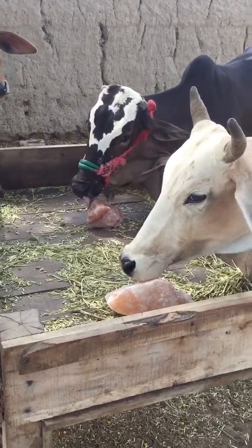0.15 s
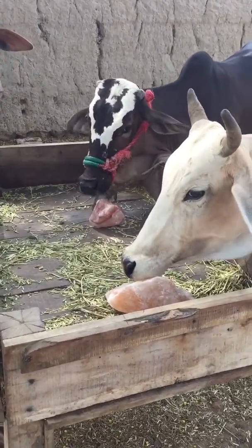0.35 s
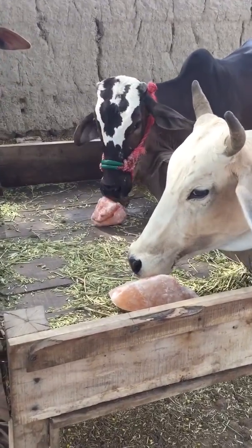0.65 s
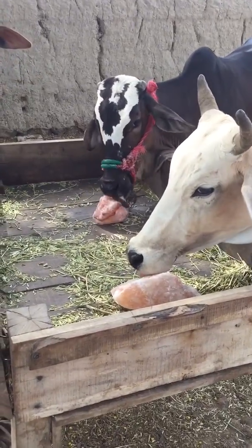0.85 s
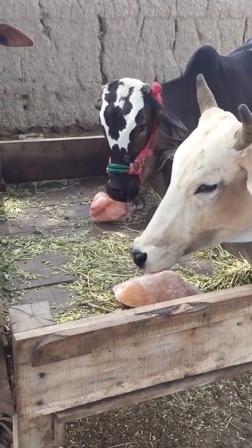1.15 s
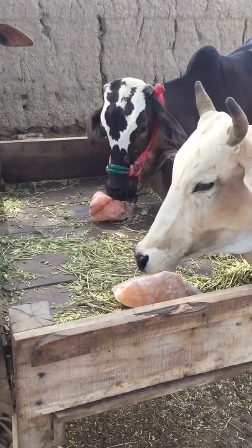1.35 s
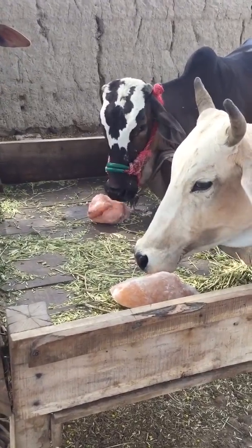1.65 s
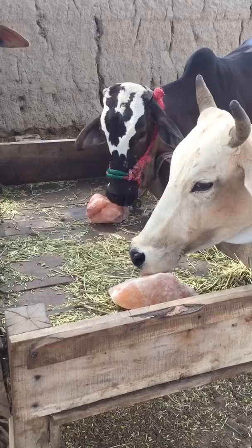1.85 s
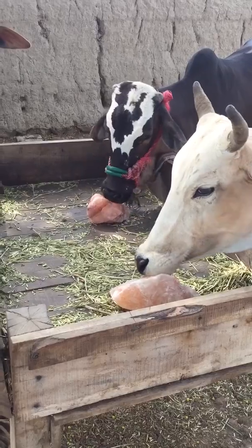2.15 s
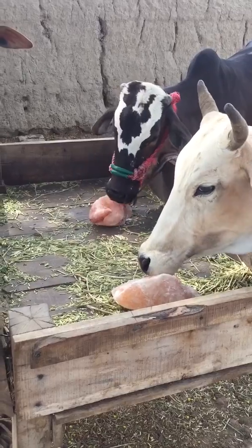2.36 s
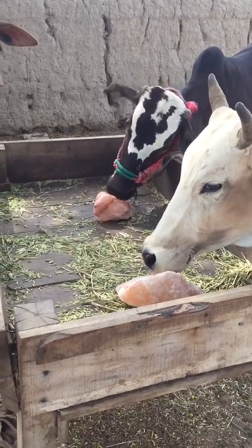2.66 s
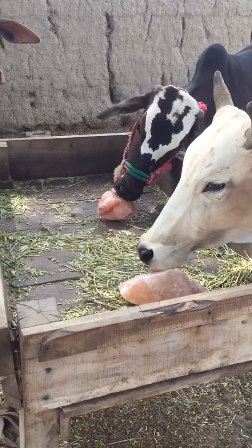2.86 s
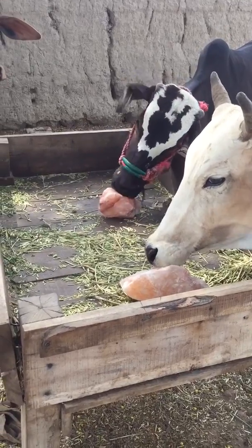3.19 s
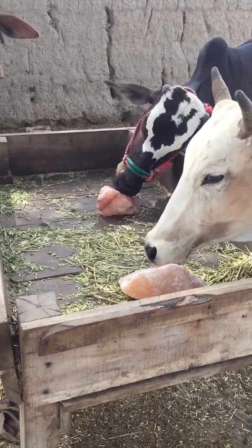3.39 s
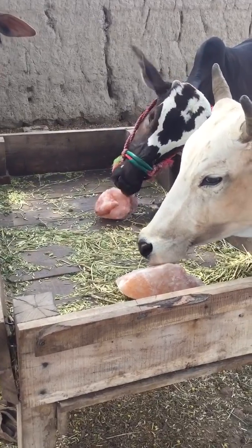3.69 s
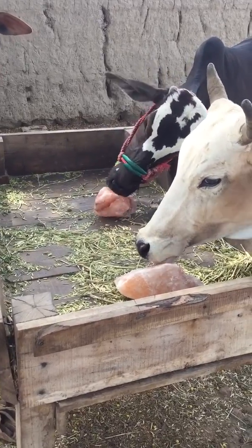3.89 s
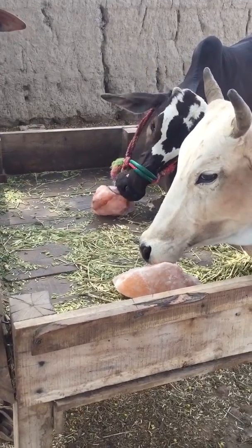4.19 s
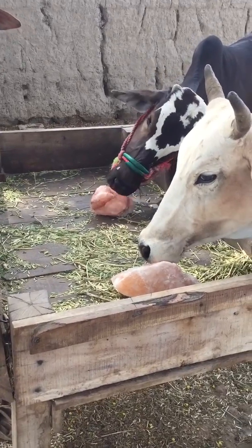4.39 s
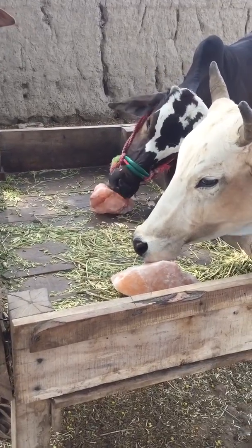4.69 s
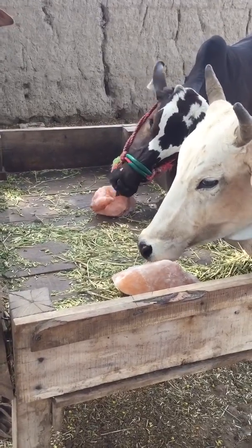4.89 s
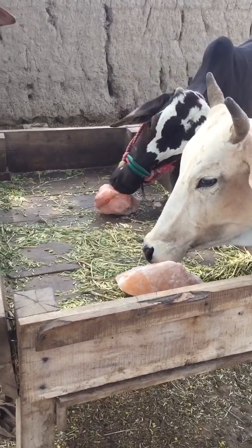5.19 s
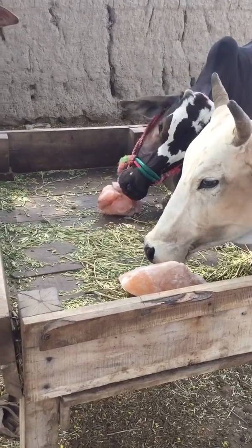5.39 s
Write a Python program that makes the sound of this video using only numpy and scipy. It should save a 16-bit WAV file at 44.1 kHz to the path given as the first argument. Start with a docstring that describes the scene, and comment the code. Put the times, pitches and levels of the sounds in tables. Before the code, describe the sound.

Close mono sound of cows licking rock salt in a wooden trough. A long rasping, slurping stroke swells to about 0.2-0.3 s, with a tight cluster of hollow wooden knocks and a grinding drag; a wet smack follows at 0.45. A faint, hoarse distant low sinks away by 0.65. It is calmer until a softer lick near 1.0-1.2 with dull bumps. A sharp crunch comes at 1.67, and short licks and light knocks run from 1.7 to 2.4, with a tiny chirp at 1.9. Knocks crowd at 2.6-2.7 over faint chirps, then a strong wet lick and drag at 3.0. Another rasp with a crisp crunch falls around 3.7. Heavy knocks and smacks hit at 4.35 and 4.93, the latter with a juicy slurp; faint chirps follow at 5.1-5.2. It ends on a loud knock, wet smack and scrape at 5.5. Low boom, quiet air and a short pen tail underlie everything.

```python
"""Cows licking rock salt in a wooden trough

Tongue strokes swell, hold and let go: filtered random clicks rasp and slurp while a dragged lump
grinds on the wood. Knocks are decaying plank modes; lip smacks are click bursts ringing the mouth.
Spit hisses, crystal edges crunch, a bird chirps in glides and a far cow lows in harmonics.
Low boom and quiet air lie beneath; a mud-walled pen adds a short tail."""
import sys
import numpy as np
from scipy import signal
from scipy.fft import rfft, irfft, next_fast_len
from scipy.io import wavfile
from scipy.ndimage import uniform_filter1d

SR = 44100
rng = np.random.default_rng(int(sys.argv[2]) if len(sys.argv) > 2 else 0)


def transcribe(signal):
    """Save signal, clipped to [-1, 1], as a 16-bit WAV file at the path in sys.argv[1]."""
    frames = np.atleast_2d(signal).T
    limited = np.clip(frames, -1, 1)
    pcm = np.round(limited * 32767).astype(np.int16)
    wavfile.write(sys.argv[1], SR, pcm)


N = 244307
TIME = np.arange(N) / SR

# All table levels are relative; the functions add their own gains.
# strokes of the tongue over the salt: (full contact t/s, hold/s, swell/s, release/s,
# rasp level/dB, wet slurp level/dB, drag on the planks level/dB)
LICKS = [(0.0, 0.038, 0.12, .15, -60.5, -66, -50.5), (0.218, 0.08, 0.38, .18, -44, -48.5, -37.5),
         (1.031, 0.14, 0.25, 0.17, -52.5, -55, -47.5), (1.662, 0.028, 0.15, 0.063, -45, -54, -57.5),
         (1.903, 0.013, 0.096, 0.081, -63, -82, -68), (2.043, 0.098, 0.25, .05, -51.5, -57, -77),
         (2.299, 0.0089, 0.11, 0.08, -62, -59, -48), (2.347, 0.022, 0.039, 0.035, -44, -52.5, -49),
         (2.978, 0.075, 0.23, 0.19, -48.5, -49, -35), (3.663, 0.083, 0.24, 0.14, -49, -53, -54),
         (3.813, 0.062, .1, .15, -66.5, -66.5, -83), (3.951, 0.018, 0.16, 0.066, -51.5, -52, -49),
         (4.317, 0.11, 0.21, 0.076, -51, -56, -41), (4.695, 0.01, 0.11, 0.16, -59, -68, -58),
         (4.903, 0.087, 0.35, 0.068, -48, -49.5, -54), (5.518, .04, 0.21, .1, -55.5, -54, -27)]
# a lump knocks on the planks: (t/s, peak level/dB, deep thump level/dB, hard edge level/dB)
KNOCKS = [(0.164, -33.5, -30, -53), (0.226, -15.5, -17.5, -19.5), (0.254, -23.5, -18, -18.5),
          (0.296, -22, -22, -17), (0.334, -23.5, -32, -14), (1.112, -33, -12, -19), (1.203, -37, 8, -43),
          (1.264, -27.5, -8, -40), (1.347, -29, -17, -17.5), (1.73, -30.5, -7, -25),
          (1.849, -24, -6.5, -13.5), (1.942, -21, 1, -17.5), (2.18, -38, -23, -19.5),
          (2.271, -29, -14.5, -21), (2.343, -16.5, -18.5, -32.5), (2.541, -34.5, -5, -19),
          (2.612, -11.5, -11.5, -19), (2.655, -16, -11, -24), (2.696, -10.5, -17, -24),
          (2.715, -16, -8.5, -20), (2.839, -28, -16, -26), (2.963, -10, -14, -12.5), (2.984, -18, -34, -22),
          (3.047, -16.5, -15.5, -15), (3.066, -18.5, -5, -11), (3.121, -29.5, 16, -3), (3.164, -36, 5, -10),
          (3.308, -34, -29, -26), (3.624, -13.5, -11.5, -16), (3.659, -20, -9.5, -46),
          (3.874, -39, -34, -16), (3.943, -15.5, -14.5, -22.5), (4.021, -22, -7, -24),
          (4.056, -22, -5, -49), (4.213, -29, -27, -22), (4.268, -26.5, -15, -19), (4.316, -19, -8, -19),
          (4.353, -4.5, -17.5, -20.5), (4.437, -36, -1, -16), (4.508, -28, -7.5, -13.5),
          (4.812, -30, -20, -14.5), (4.863, -32.5, -17, -16.5), (4.928, -10, -11, -20),
          (5.184, -15, -14.5, -21.5), (5.352, -34, -15, -6), (5.465, -20, -20.5, -19.5),
          (5.513, -7, -13.5, -27.5)]
# modes of the loaded trough floor: (f/Hz, level/dB, t60/s)
PLANKS = [(84.7, -40, 0.18), (100.7, -8.5, 0.37), (134.7, 8, 0.083), (166, 0.5, 0.079), (221.9, -2.5, 0.12),
          (271, 5, 0.057), (300, 0, 0.098), (382.5, -5, 0.098), (471, -8, 0.028), (629, -17.5, 0.058),
          (726.6, -8.5, 0.062), (795, -14.5, 0.07), (838, -29, 0.069), (1077, -9, 0.037),
          (1250, -20, 0.013), (1580, -23, 0.054), (1411, -17.5, 0.046), (2030, -23.5, 0.033)]
# spectrum of dry tongue on crystal: (f/Hz, level/dB)
RASP = [(3000, -16), (5500, -9), (7200, -3.5), (8600, 7), (10200, 1), (11800, 4), (14000, -0.5),
        (16000, 1.5)]


def undb(db):
    """Amplitude ratio of a level in dB."""
    return 10 ** (np.asarray(db) / 20)


def unit(x):
    """Normalization: the sound at rms 1."""
    return x / np.sqrt(np.mean(x ** 2))


def add(out, sound, start):
    """Superposition: mix a sound in at its start time in s."""
    i = max(int(start * SR), 0)
    out[i:i + len(sound)] += sound[:max(len(out) - i, 0)]


def colour(x, points):
    """Spectral shaping by (f/Hz, level/dB) points, interpolated over log frequency; rms 1."""
    hz, db = np.transpose(points)
    n = next_fast_len(len(x), True)
    f = np.maximum(np.fft.rfftfreq(n, 1 / SR), 1)
    gain = undb(np.interp(np.log(f), np.log(hz), db))
    return unit(irfft(rfft(x, n) * gain, n)[:len(x)])


def resonate(x, hz, width_hz):
    """A single resonance of given bandwidth, gain 1 at its centre."""
    b, a = signal.iirpeak(min(hz, SR / 2 - 1000), hz / width_hz, fs=SR)
    return signal.lfilter(b, a, x)


def fade(t, t60):
    """Free exponential decay: the level falls 60 dB in t60 seconds."""
    return np.exp(-np.log(1000) * t / t60)


def walk(rate):
    """Random modulation: random levels 1 / rate s apart, joined by straight slopes; rms 1."""
    k = max(int(SR / rate), 1)
    steps = np.repeat(rng.standard_normal(N // k + 1), k)
    return unit(uniform_filter1d(steps, k)[:N])


def grains(rate, spread_db):
    """Shot noise: clicks of uneven size and random sign, on average rate per second; rms 1."""
    hit = rng.random(N) < rate / SR
    sign = rng.choice([-1, 1], N)
    size = undb(spread_db * np.minimum(rng.exponential(size=N), 4))
    return unit(hit * sign * size)


def shifting(x, depth_db, size=256):
    """Time-varying resonance: the tongue-salt gap changes shape, so broad peaks come and go."""
    bands = signal.stft(x, nperseg=size)[2]
    field = rng.standard_normal(bands.shape)
    # smooth twice over frequency, then twice over time
    for axis in (0, 0, 1, 1):
        field = uniform_filter1d(field, size=5 + 5 * axis, axis=axis)
    return signal.istft(bands * undb(depth_db * unit(field)), nperseg=size)[1][:N]


def stroke(start, hold, swell, release):
    """Exponential envelope: the pressure of a lick swells, holds and lets go."""
    swell_db = 49.5  # rise during swell seconds, fall during release seconds
    early = np.maximum(start - TIME, 0)
    late = np.maximum(TIME - start - hold, 0)
    return undb(-swell_db * (early / swell + late / release))


def grinding():
    """Forced vibration: the sliding lump ticks over the wood grain and keeps the planks ringing."""
    # spectrum of the lump sliding on wood: (f/Hz, level/dB)
    drag_colour = [(35, -32), (70, 21), (130, 4), (320, 15.5), (480, -17), (750, -1), (1150, -17),
                   (1800, -15), (3500, -33)]
    ring_db, tilt_db_per_octave = -4, 7.5  # plank ringing; the tilt weakens modes below 330 Hz and spares those above
    t = np.arange(SR // 4) / SR
    ticks = grains(rate=700, spread_db=2.0)
    hz, db, t60 = np.transpose(PLANKS)
    gain = undb(db + tilt_db_per_octave * np.minimum(np.log2(hz / 330), 0))
    modes = np.sin(2 * np.pi * np.outer(hz, t)) * fade(t, t60[:, None])
    ringing = unit(signal.fftconvolve(ticks, gain @ modes)[:N])
    return unit(colour(ticks, drag_colour) + undb(ring_db) * ringing)


def tongue(rasp_db=-1, slurp_db=0, drag_db=2, catch_db=2, judder_db=1.5):
    """Stick-slip: horny papillae catch on crystals, spit fizzes and the dragged lump grinds on wood."""
    # spectrum of fizzing spit: (f/Hz, level/dB)
    slurp_colour = [(700, 8.5), (1500, 8), (2600, 5.5), (4000, 4), (6200, 7.5), (8500, -0.5), (15000, -14)]
    idle_slurp_db, idle_drag_db, idle_wander_db = -76.5, -70, 6  # mouths work between strokes
    breakaway_s, settle_s = 0.078, 0.28  # swell and release times of the sliding lump
    idle = undb(idle_wander_db * walk(12))
    rasp, slurp, drag = 0, undb(idle_slurp_db) * idle, undb(idle_drag_db) * idle
    for start, hold, swell, release, dry_db, wet_db, pull_db in LICKS:
        pressure = stroke(start, hold, swell, release)
        rasp = rasp + undb(dry_db) * pressure
        slurp = slurp + undb(wet_db) * pressure
        drag = drag + undb(pull_db) * stroke(start, hold, breakaway_s, settle_s)
    catch = unit(undb(catch_db * walk(160)))  # rows of papillae let go together
    judder = unit(undb(judder_db * walk(60)))  # the lump sticks and slides
    crystals = shifting(grains(rate=7000, spread_db=4), depth_db=2.8)
    spit = shifting(grains(rate=3500, spread_db=3.5), depth_db=3.6)
    dry_hiss = undb(rasp_db) * rasp * colour(crystals, RASP)
    wet_hiss = undb(slurp_db) * slurp * colour(spit, slurp_colour)
    return catch * (dry_hiss + wet_hiss) + undb(drag_db) * drag * judder * grinding()


def boom():
    """Low-mode excitation: leaning muzzles, lick pushes and knocks stir the bottom of the trough."""
    rest_db, wander_db = -63, 5  # muzzles leaning on the trough
    push_db, settle_s = -23, 0.66  # boom of a stroke relative to its drag; its release time
    knock_db, knock_t60_s = -33, 0.28  # boom of a knock relative to its peak
    push = np.zeros(N)
    for start, hold, swell, *_, pull_db in LICKS:
        push += undb(pull_db + push_db) * stroke(start, hold, swell, settle_s)
    ringing = fade(np.arange(SR // 3) / SR, knock_t60_s)
    for start, db, _, _ in KNOCKS:
        add(push, undb(db + knock_db) * ringing, start)
    low_modes = [(25, -15), (45, 14.0), (68, 9.5), (100, 1.5), (135, 0.5), (220, -8), (400, -43)]
    body = colour(grains(rate=110, spread_db=0.1), low_modes)
    return (push + undb(rest_db + wander_db * walk(7.06))) * body


def far_cow(jitter=0.0185, shimmer_db=2.0):
    """Source and filter: the sinking end of a hoarse low, vocal-fold harmonics shaped by the throat."""
    # glide of the low: (t/s, f/Hz, level/dB)
    lowing = [(0, 115.7, -54.5), (0.151, 116, -84), (0.379, 108.8, -53.5), (0.46, 107, -58.5),
              (0.52, 103.3, -60), (0.58, 99, -82), (0.66, 94, -100)]
    # formants of the throat: (f/Hz, level/dB)
    throat = [(100, -29), (210, -3.5), (320, -12), (420, -1), (530, 3.5), (630, -18), (750, -20),
              (1100, -14), (2000, -33)]
    s, hz, db = np.transpose(lowing)
    pitch = np.interp(TIME, s, hz) * (1 + jitter * walk(102.0))
    phase = 2 * np.pi * np.cumsum(pitch) / SR
    folds = sum(np.sin(k * phase) for k in range(1, 14))
    level = undb(np.interp(TIME, s, db) + shimmer_db * walk(24.0))
    return colour(folds, throat) * level * (TIME < s[-1])


def yard(swell_db=5.7):
    """Broadband noise: in quiet open air the range below 2 kHz flickers, the far hiss stays smooth."""
    # spectrum of the open air: (f/Hz, level/dB)
    air_colour = [(25, -14), (60, 2), (100, -2), (300, -22.5), (430, -14.5), (650, -19.5), (1300, -20),
                  (2000, -19.5), (4000, -26.5), (8000, -32), (15500, -32.5)]
    level_db = -63
    air = colour(rng.standard_normal(N), air_colour)
    low = signal.sosfiltfilt(signal.butter(2, 2000, fs=SR, output="sos"), air)
    return undb(level_db) * (air - low + undb(swell_db * walk(60)) * low)


def lip_ticks():
    """Random point events: faint smacks at random times, each with its own mouth shape."""
    per_s, level_db, snap_db = 3, -56.5, -16
    centre_hz, octaves = 1710, .55  # mouth resonance and its spread either way
    chance = rng.random((int(per_s * N / SR), 2))
    return [(when * N / SR, level_db, centre_hz * 2 ** (octaves * (2 * shape - 1)), snap_db)
            for when, shape in chance]


def smacks(width_hz=200, upper=1.587, upper_db=-7, snap_db=3, t60=0.071, snap_t60=0.031,
           peel_s=0.0018, gain_db=1):
    """Cavity resonance: a saliva film peels and snaps in a burst of clicks that ring the mouth."""
    # wet smacks of lips and tongue: (t/s, peak level/dB, mouth resonance f/Hz, bright snap level/dB)
    smack_events = [(0.060, -41.5, 1330, 4), (0.447, -32, 1390, 13), (0.452, -38, 910, -35),
                    (0.772, -50.5, 965, -5), (0.794, -49, 1670, -8), (0.858, -46.5, 1140, -19),
                    (1.1, -48, 1780, -21), (1.347, -47.5, 1730, -6), (1.449, -52.5, 1410, -12),
                    (1.470, -48.5, 1090, -7), (1.783, -49, 755, -25), (2.093, -48.5, 2040, -23),
                    (2.250, -43.5, 1170, -7), (2.329, -42, 1920, -14), (2.614, -37.5, 1920, -8),
                    (2.655, -40.5, 1740, -11), (2.697, -43.5, 2600, -2), (2.717, -36, 2070, 2),
                    (2.787, -49, 1560, -20), (2.913, -35.5, 1580, 5), (3.116, -51, 1880, -10),
                    (3.478, -50.5, 1960, -1), (3.514, -49, 1740, -15), (4.268, -33.5, 1080, 9),
                    (4.357, -32, 1570, 7), (4.439, -34, 1440, 0), (4.71, -45.5, 2000, -13),
                    (4.930, -25.5, 2290, 11), (5.299, -44, 1900, -6), (5.494, -41, 1090, 6),
                    (5.513, -28.5, 2200, -3.5)]
    snap_colour = [(400, -1), (1200, 9.0), (3800, 1.5), (6000, -11.5), (15000, -32)]
    out, t = np.zeros(N), np.arange(SR // 10) / SR
    for start, db, hz, bright in smack_events + lip_ticks():
        clicks = rng.laplace(size=len(t))
        peel = clicks * fade(t, t60) * (1 - np.exp(-t / peel_s))
        second = resonate(peel, upper * hz, 2 * width_hz)
        mouth = resonate(peel, hz, width_hz) + undb(upper_db) * second
        snap = colour(clicks, snap_colour) * fade(t, snap_t60)
        smack = unit(resonate(mouth, hz, hz)) + undb(bright + snap_db) * unit(snap)
        add(out, undb(db + gain_db) * smack / np.abs(smack).max(), start)
    return out


def landings():
    """Rocking body: every knock is followed by a softer, deeper bump as the lump rocks back."""
    rock_s, scatter = .068, 0.11  # mean delay; its scatter as a share
    rock_db, rock_thump_db = -21.5, 17  # both relative to the first landing
    delays = rock_s * (1 + scatter * rng.standard_normal(len(KNOCKS)))
    for (start, db, thump, edge), delay in zip(KNOCKS, delays):
        yield start, db, thump, edge
        yield start + delay, db + rock_db, thump + rock_thump_db, edge


def bend(x, lag_s):
    """Dispersion of bending waves in a plank: treble arrives first, 300 Hz comes lag_s late."""
    f = np.fft.rfftfreq(2 * len(x), 1 / SR)
    delay = np.exp(-4j * np.pi * lag_s * np.sqrt(300 * f))
    return irfft(rfft(x, 2 * len(x)) * delay)[:len(x)]


def knocks(thump_db=9, edge_db=16, clatter_db=-10, clatter_t60=0.12, contact_s=0.0022,
           lag_s=0.002705, gain_db=-1):
    """Modal synthesis: a lump tips onto the planks; where and how hard it lands weights the modes."""
    # dense higher modes and scattered sound of the trough: (f/Hz, level/dB)
    clatter_colour = [(50, -40), (110, -7.5), (340, 4.5), (500, 4), (750, -12), (1100, -6), (1600, -28),
                      (2600, -25), (5000, -60), (12000, -47.5)]
    out, t = np.zeros(N), np.arange(SR // 3) / SR
    hz, mode_db, t60 = np.transpose(PLANKS)
    deep = np.clip(np.log2(240 / hz), 0, 1)
    hard = np.clip(np.log2(hz / 330), 0, 1)
    press = 1 - np.exp(-(t / contact_s) ** 2)  # wet fodder under the lump cushions the blow
    for start, db, thump, edge in landings():
        # each landing varies mode level (dB) and frequency (share)
        size, shift = rng.standard_normal((2, len(hz))) * [[1.5], [.025]]
        gain = undb(mode_db + deep * (thump + thump_db) + hard * (edge + edge_db) + size)
        modes = np.sin(2 * np.pi * np.outer(hz * (1 + shift), t)) * fade(t, t60[:, None])
        clatter = colour(rng.standard_normal(len(t)), clatter_colour) * fade(t, clatter_t60)
        clatter_gain = undb(clatter_db + .5 * (edge + edge_db))
        knock = bend(press * (gain @ modes + clatter_gain * clatter), lag_s)
        add(out, undb(db + gain_db) * knock / np.abs(knock).max(), start)
    # an open plank radiates almost nothing below its first mode
    return signal.sosfilt(signal.butter(3, 62, "high", fs=SR, output="sos"), out)


def sucks(width_hz=600, gain_db=0):
    """Flow noise: spit sucked through a narrow lip-salt gap hisses in one resonance."""
    # hissing swells: (start t/s, length/s, level/dB, resonance f/Hz)
    suck_events = [(0.193, 0.073, -52, 3740), (1.145, 0.054, -63, 6250), (1.899, 0.046, -61, 7300),
                   (2.074, 0.073, -58, 4250), (3.649, 0.073, -58.5, 4440), (4.686, 0.081, -67, 6730),
                   (4.807, 0.065, -61, 6400), (5.129, 0.16, -65.5, 1950)]
    out = np.zeros(N)
    for start, length, db, hz in suck_events:
        flow = rng.laplace(size=int(length * SR))
        hiss = resonate(resonate(flow, hz, width_hz), hz, 2 * width_hz)
        swell = signal.windows.tukey(len(hiss), .5)
        add(out, undb(db + gain_db) * unit(hiss * swell), start)
    return out


def crunches(gain_db=-1):
    """Impulsive release: papillae snap over a sharp crystal edge in a short bright noise burst."""
    # snaps over an edge: (t/s, peak level/dB)
    crunch_events = [(1.472, -37.5), (1.67, -19.5), (1.68, -25.5), (2.088, -31), (2.354, -26.5),
                     (2.978, -28), (3.071, -31), (3.487, -47.5), (3.734, -21)]
    out, t = np.zeros(N), np.arange(SR // 20) / SR
    spray = fade(t, .014)
    for start, db in crunch_events:
        crunch = colour(rng.standard_normal(len(t)), RASP) * spray
        add(out, undb(db + gain_db) * crunch / np.abs(crunch).max(), start)
    return out


def bird(flutter_db=-1.0):
    """Frequency modulation: short hoarse chirps, each one wavering glide through three pitches."""
    # chirps: (start t/s, length/s, level/dB, start f/Hz, middle f/Hz, end f/Hz)
    chirp_events = [(1.892, 0.055, -66.5, 5400, 4560, 3870), (2.614, 0.015, -64, 4360, 4330, 4440),
                    (2.644, 0.052, -62, 6200, 5600, 5840), (2.673, 0.027, -66, 5030, 3640, 2980),
                    (5.12, 0.066, -67.5, 4000, 3620, 3120), (5.209, 0.058, -66, 3160, 3710, 3600)]
    out, flutter = np.zeros(N), walk(480)
    waver = 1 + .075 * walk(1300)
    for start, length, db, *pitches in chirp_events:
        u = np.linspace(0, 1, int(length * SR))
        here = int(start * SR) + np.arange(len(u))
        glide = np.polyval(np.polyfit([0, .5, 1], pitches, 2), u)
        tone = np.sin(2 * np.pi * np.cumsum(glide * waver[here]) / SR)
        chirp = tone * signal.windows.tukey(len(u), .5) * undb(flutter_db * flutter[here])
        add(out, undb(db) * unit(chirp), start)
    return out


def band_dip(x, dip_hz=505, width_hz=130, depth=0.43):
    """Band dip: the sound is thinned around 505 Hz by subtracting part of that band."""
    return x - depth * resonate(x, dip_hz, width_hz)


def pen(x, wet_db=-19, t60=0.14, low_db=-14, low_t60=0.87, gap_s=.012):
    """Reverberation: mud wall and boards throw back a short tail; bass lingers in the trough."""
    t = np.arange(SR // 2) / SR
    scatter = rng.standard_normal(len(t)) * (t > gap_s)
    wall_colour = [(60, 9.5), (1500, 8.0), (6000, 11), (15000, -5.0)]
    hollow_colour = [(40, -8), (90, 16), (170, 5.0), (330, -33.0), (700, -42)]
    wall = colour(scatter, wall_colour) * fade(t, t60)
    hollow = colour(scatter, hollow_colour) * fade(t, low_t60)
    # the wall is scaled by its energy, the hollow by its strongest frequency
    wall_tail = undb(wet_db) * wall / np.linalg.norm(wall)
    low_tail = undb(low_db) * hollow / np.abs(rfft(hollow)).max()
    return x + signal.fftconvolve(x, wall_tail + low_tail)[:N]


def scene():
    """Superposition of everything in the pen, as one channel."""
    licking = band_dip(knocks() + smacks() + crunches() + tongue() + sucks())
    return (pen(licking + bird()) + boom() + far_cow() + yard())[None]


def record(dry):
    """Band limiting: a high-pass thins the deep bass and a steep low-pass cuts the top."""
    top_hz = 15680
    thin = signal.sosfilt(signal.butter(2, 38, "high", fs=SR, output="sos"), dry)
    return signal.sosfilt(signal.ellip(12, .2, 80, top_hz, fs=SR, output="sos"), thin)


dry = scene()
out = record(dry)
transcribe(out)
```